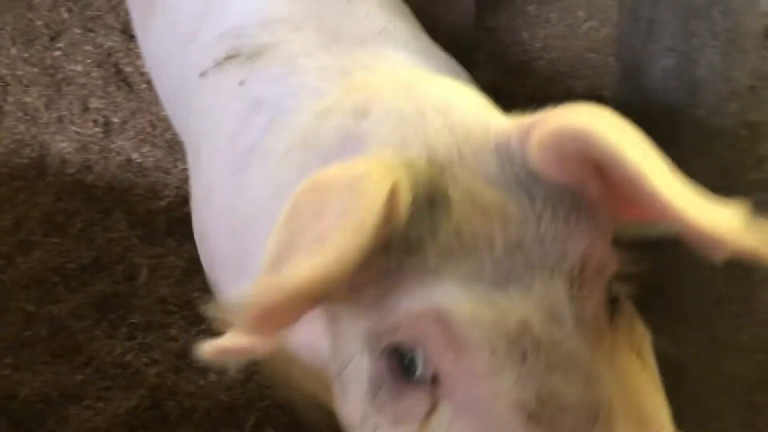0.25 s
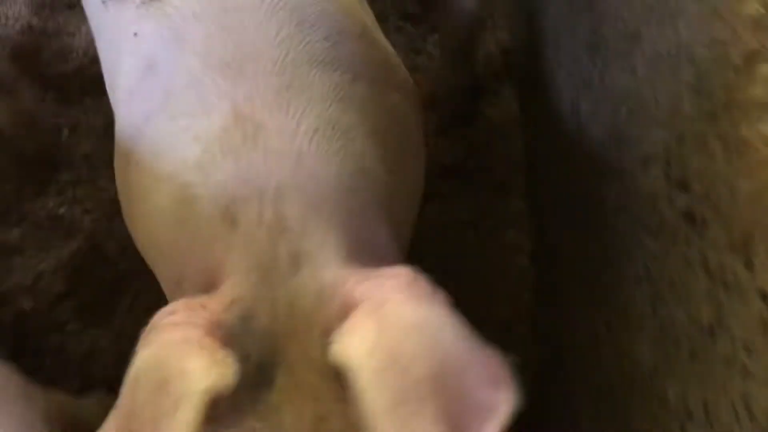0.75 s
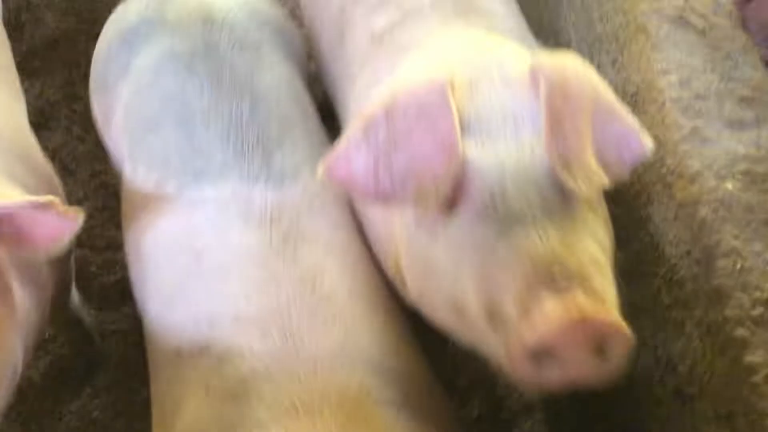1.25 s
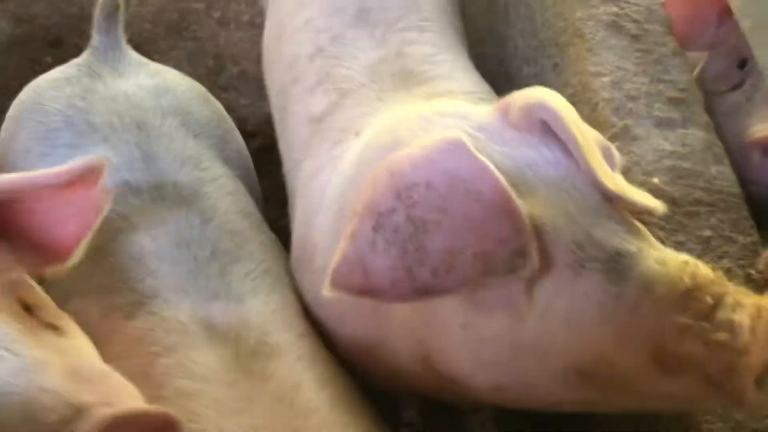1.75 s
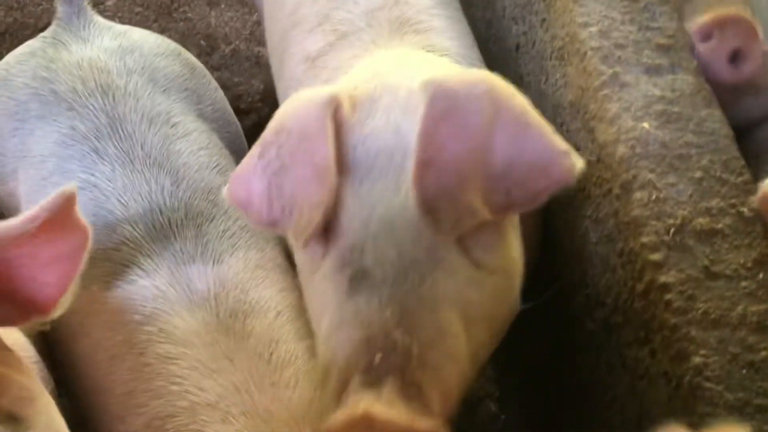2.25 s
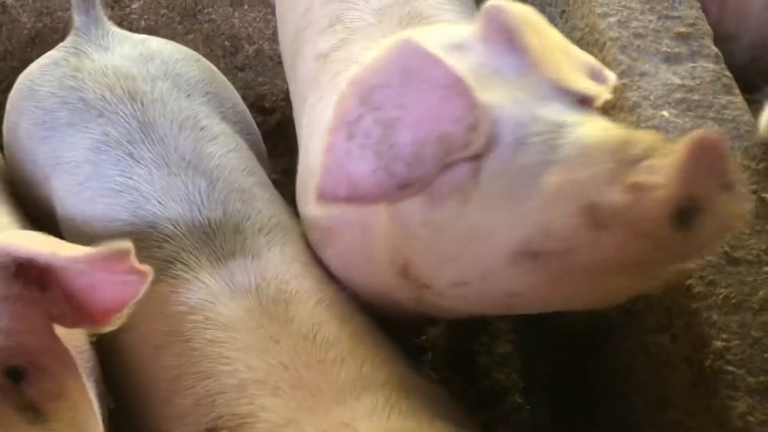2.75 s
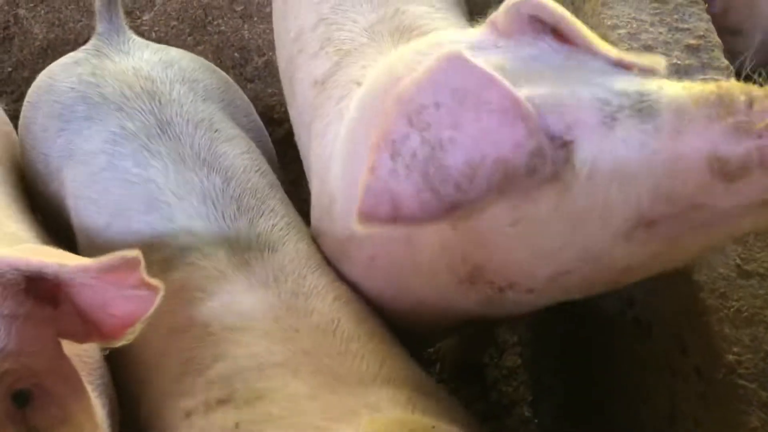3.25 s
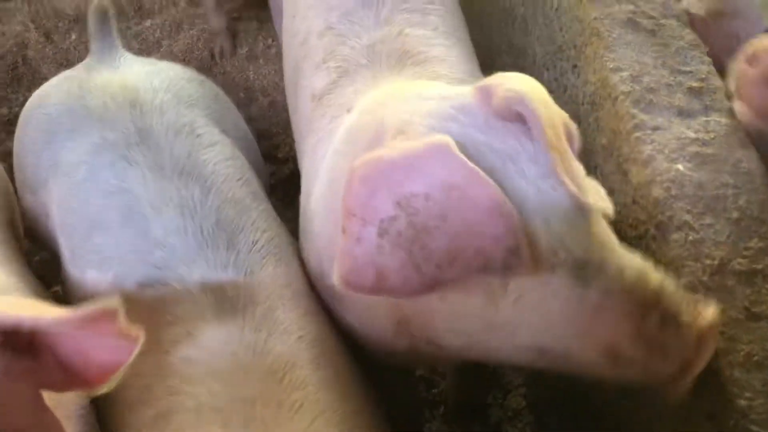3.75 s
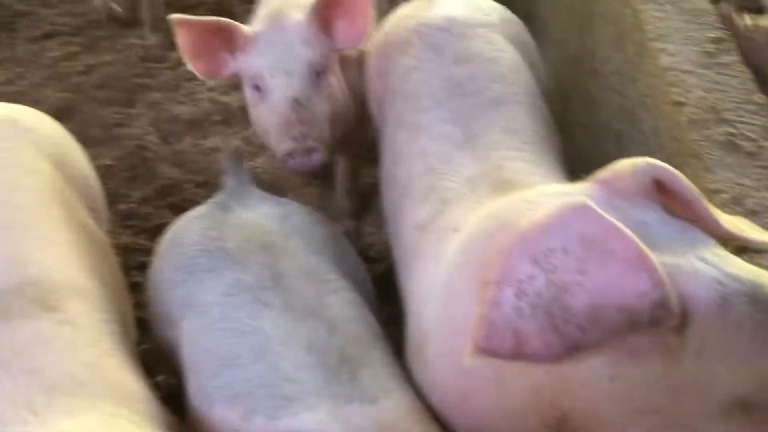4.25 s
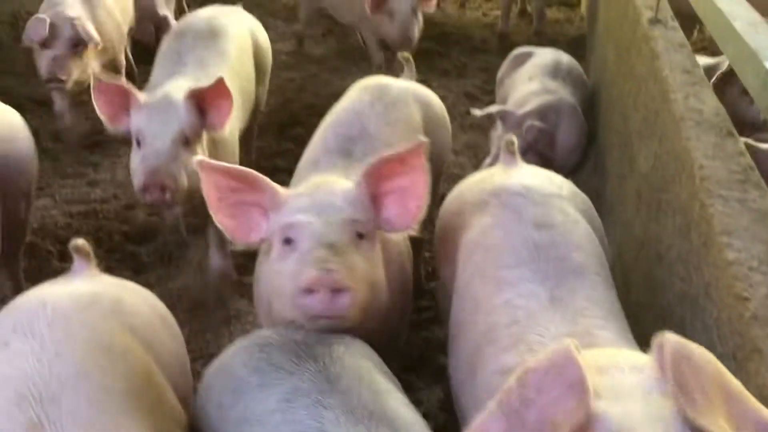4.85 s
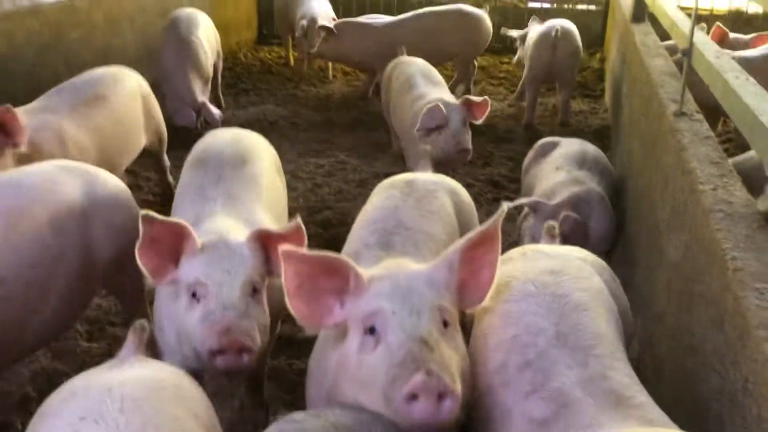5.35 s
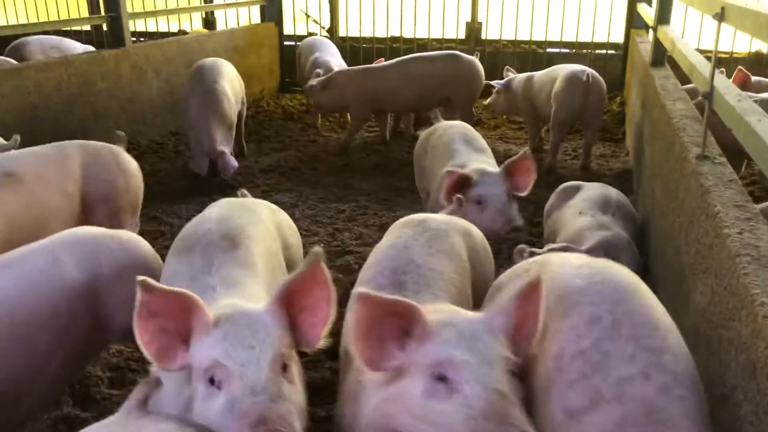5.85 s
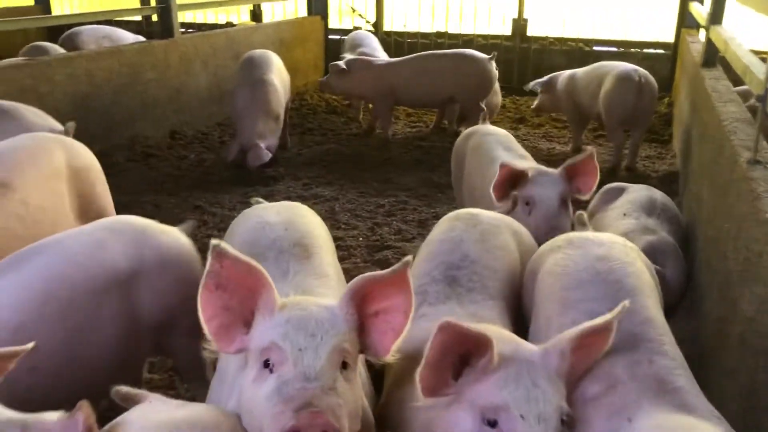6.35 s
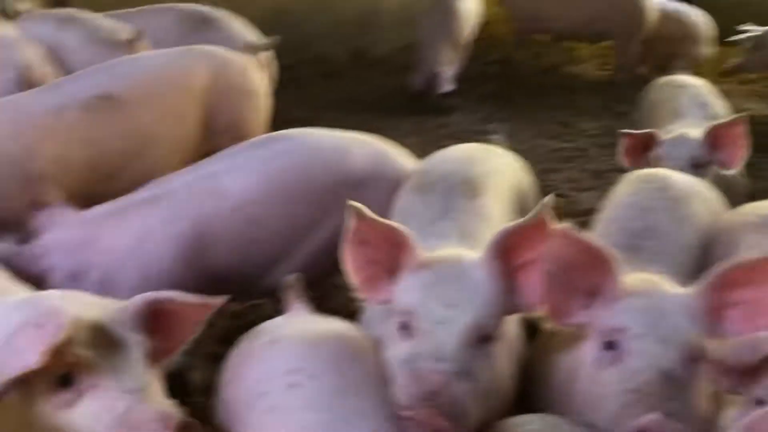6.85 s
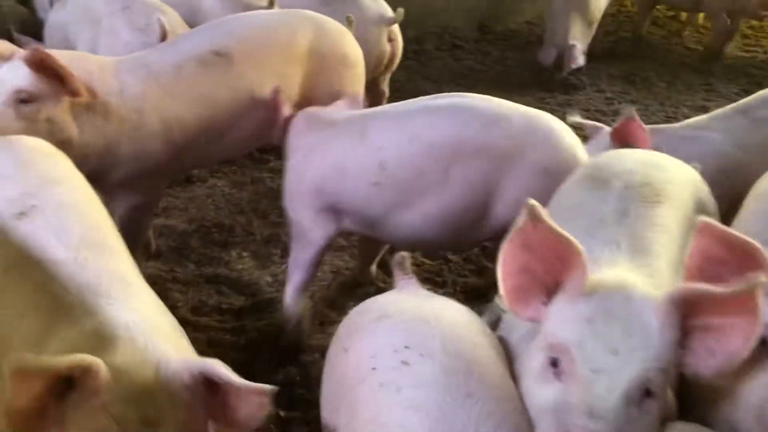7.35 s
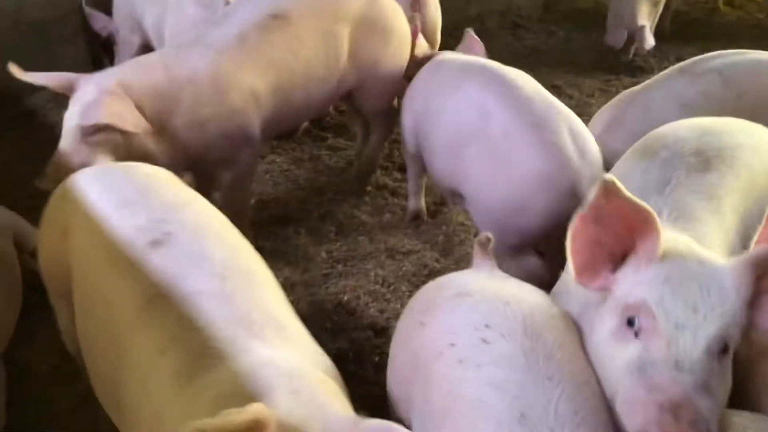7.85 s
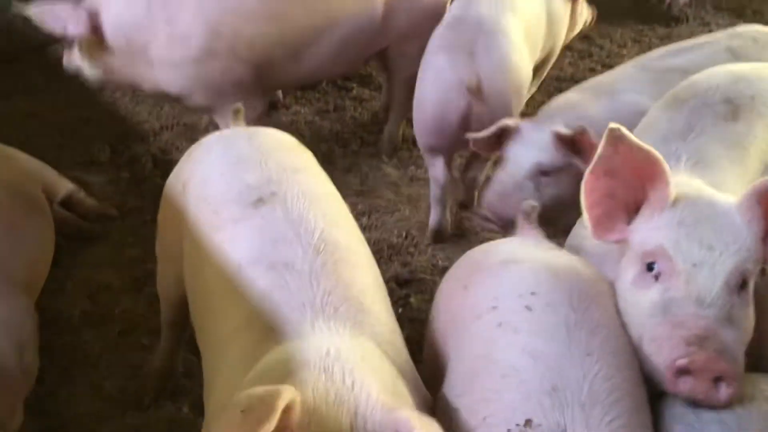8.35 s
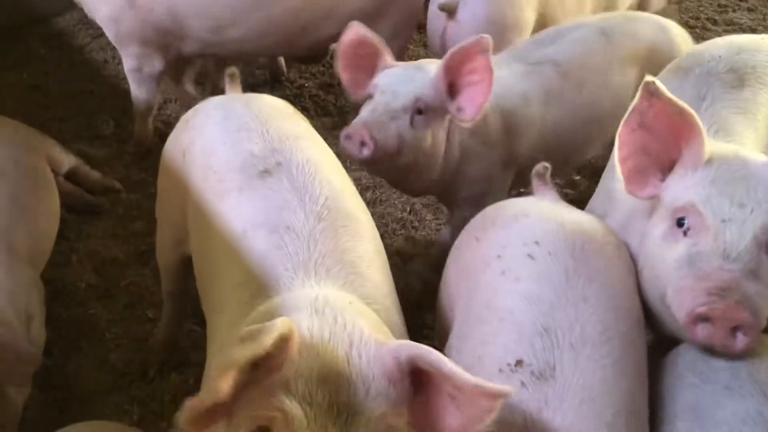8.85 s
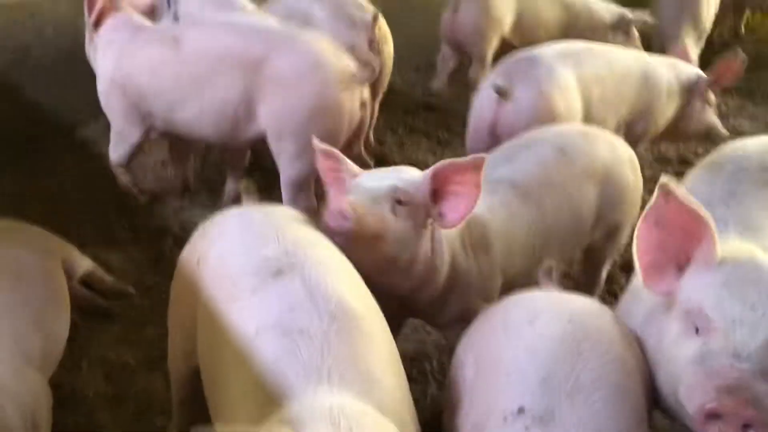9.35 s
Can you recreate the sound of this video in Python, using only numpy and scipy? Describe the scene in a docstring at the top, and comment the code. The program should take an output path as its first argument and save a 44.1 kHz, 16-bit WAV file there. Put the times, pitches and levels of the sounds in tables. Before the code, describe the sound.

Several young pigs grunt close to the microphone in a concrete barn pen, one short, creaky call after another, with hissing sniffs between them. Their bodies bump the fittings with dull booms. Near the middle comes one loud slam and a brief scrape. The grunts carry on more softly, then a sharper call sounds near the end. The rest of the herd murmurs further off over rustling litter.

```python
"""Young pigs grunt in a concrete pen of an open-sided barn. Each grunt is a source driving a filter:
a few slow glottal pulses excite the resonances of nose, mouth and throat, and some close into a hum.
Bodies strike and rub the fittings, and snouts sniff with a turbulent hiss. The rest of the herd
murmurs further off, its grunts heard mostly through the reverberation of roof and walls."""
import sys
import numpy as np
from scipy import signal
from scipy.fft import rfft, irfft, next_fast_len
from scipy.io import wavfile
from scipy.ndimage import map_coordinates

SR = 44100
rng = np.random.default_rng(int(sys.argv[2]) if len(sys.argv) > 2 else 0)


def bounce(signal):
    """Save signal as a 16-bit WAV file at the path given by the first command-line argument."""
    frames = np.transpose(np.atleast_2d(signal))
    limited = np.clip(frames, -1, 1)
    pcm = np.round(limited * 32767).astype(np.int16)
    wavfile.write(sys.argv[1], SR, pcm)


N = 422919
TIME = np.arange(N) / SR
LEAD_S = .012  # room for the brief soft noise with which a pulse fades in

# Grunts: (time [s], pulses [count], pulse rate [Hz], crest position [0-1], swell [dB per grunt length],
# mouth shape [name], mouth level [dB], nose level [dB], rasp level [dB])
GRUNT_CALLS = [(0.015, 4, 39.6, 0.14, 10, "slack", -39, -33.5, -38),
               (0.119, 4, 42.5, 0.86, 10.5, "round", -23.5, -28.5, -32),
               (0.405, 4, 42.2, 0.2, 8, "round", -23.5, -29.5, -39),
               (0.365, 6, 40.1, 0.4, -5, "shut", -36, -33.5, -38),
               (0.527, 3, 36.1, 0.4, 9, "shut", -32.5, -26, -31.5),
               (0.701, 3, 47.6, 0.57, 12, "oink", -21, -51, -29),
               (0.752, 4, 43.04, 0.2, 3, "shut", -46, -40, -36.5),
               (0.827, 2, 34.6, 0.95, 6, "gape", -30, -27.5, -27.5),
               (1.079, 4, 40.67, 0.64, 25.5, "open", -16.5, -25, -24),
               (1.255, 5, 37.7, 0.3, 17, "shut", -36, -27, -39),
               (1.386, 3, 38.4, 0.82, 41, "open", -27.5, -27.5, -30.5),
               (1.478, 5, 45.65, 0.44, 23, "twang", -30.5, -29.5, -27.5),
               (1.675, 2, 33.1, 0.5, 2, "round", -43, -34.5, -44.5),
               (1.948, 4, 32.67, 0.3, 20, "open", -26.5, -27.5, -36.5),
               (2.112, 5, 35.2, 0.41, 12, "shut", -31, -31, -35.5),
               (2.318, 5, 40.78, 0.67, 33, "twang", -27, -25, -30),
               (2.754, 3, 36.25, 0.6, 14, "oink", -27, -29, -29),
               (2.828, 4, 40.2, 0, 6, "shut", -34, -30, -35.5),
               (3.021, 3, 37.9, 1, 2, "shut", -35, -32, -36.5),
               (3.094, 4, 44.3, 0.38, 6, "twang", -27.5, -25, -30),
               (3.473, 4, 36.84, 0.83, 9, "wide", -38, -51, -40),
               (3.645, 4, 31.44, 0.77, 22, "slack", -37, -32, -32.5),
               (3.914, 4, 36.5, 0.2, 9, "wide", -34, -31, -34.5),
               (4.557, 5, 34.04, 0.5, 10, "shut", -39, -33.5, -39.5),
               (4.89, 7, 48.06, 0.8, 5, "shut", -48, -42, -47),
               (5.075, 4, 46.9, 0.9, 2, "slack", -44, -39, -58),
               (5.135, 5, 35.04, 0.57, 37, "nasal", -38.5, -34.5, -36),
               (5.78, 6, 59.4, 0.5, 3, "slack", -42, -40, -44.5),
               (5.98, 5, 40.77, 0.8, 14, "slack", -46, -28, -42),
               (6.323, 4, 34.17, 0.57, 46, "wide", -35, -33, -30),
               (6.67, 8, 67.6, 0.77, 14, "wide", -44, -35.5, -60),
               (6.99, 4, 51.6, 1, 0, "shut", -41.5, -41, -43),
               (7.097, 3, 33.16, 1, 14.5, "wide", -34.5, -33, -31.5),
               (7.246, 7, 57.83, 0.67, 2, "round", -41.5, -30, -53),
               (7.472, 3, 37.93, 0.9, 11.5, "nasal", -33, -33.5, -49.5),
               (7.647, 6, 40.65, 0.7, 7, "nasal", -38, -36, -41),
               (7.787, 6, 39.97, 0.36, 5, "shut", -41, -28, -37.5),
               (8.092, 2, 35.6, 1, 6, "slack", -39, -30, -44),
               (8.185, 5, 35.6, 0.37, 29, "slack", -45.5, -34, -44.5),
               (8.402, 6, 41.3, 0.42, 19, "slack", -44, -36, -62),
               (8.656, 6, 35.9, 0.39, 10, "wide", -31.5, -30.5, -32.5),
               (8.81, 4, 33.5, 0, 16, "shut", -46.5, -35, -58),
               (8.966, 4, 65.7, 0.6, 19, "cry", -20.5, -41, -26.5),
               (9.261, 5, 40.1, 0.39, 19, "snarl", -31, -29.5, -34.5)]
# Background levels, with a brief dip at 3.35 s: (time [s], murmur level [dB], rustle level [dB])
HERD_LEVELS = [(0, -31, -47), (1.07, -36, -48), (2, -28.5, -44.5), (2.6, -37.5, -45), (3.2, -32, -46),
               (3.35, -36.5, -52), (3.6, -35.5, -49), (4.2, -36.5, -45), (4.7, -38, -45), (6.9, -40.5, -48),
               (7.3, -35, -47), (7.852, -36.5, -47.5), (9.59, -38.5, -47.5)]
# Spectrum of rubbing bristles, litter and grit: (frequency [Hz], level [dB])
FRICTION_SPECTRUM = [(1000, 2.5), (2500, 1), (4500, 1.5), (6000, 1), (8500, -3), (10500, -8.5),
                     (16000, -16)]


def near_pigs():
    """Superposition: the grunts at the front of the pen add as sound pressures."""
    out = np.zeros(N)
    for start, *voice in GRUNT_CALLS:
        add(out, grunt(*voice), start - .001 - LEAD_S)
    return out


def grunt(count, rate, crest, swell_db, shape, mouth_db, nose_db, rasp_db):
    """Source-filter voicing: creaky glottal pulses excite the resonances of chest, nose and mouth."""
    # Vocal tract by shape: (three formants as (frequency [Hz], level re mouth [dB]),
    # throat as (frequency [Hz], level re rasp [dB]), second-formant glide [fraction],
    # wet crack level re rasp [dB], flap level re pulse [dB])
    tracts = {"shut": ((495, -0.9), (1200, -11.5), (1600, -4), (2750, -1.9), 0.14, -8, -7),
              "twang": ((495, -0.79), (1240, -9.5), (1460, -4.5), (2500, -1.7), 0.11, -9.5, -12.5),
              "slack": ((492, -2), (690, -3), (1622, 0), (2600, 0), 0, -4.5, -9.5), "round": ((475, -9),
              (792, 1.5), (1375, -6.5), (2750, 1), 0.063, -6.5, -13.5), "wide": ((490, -3), (1226, -3.9),
              (1526, .3), (2520, 0.91), 0.046, -5.5, -26), "nasal": ((535, -4), (1225, -1.3), (1510, 0.66),
              (2600, 1), 0, -9, -13), "snarl": ((650, -4), (1250, -1.8), (1490, 0), (3080, -1.4),
              0.049, -12, -20), "open": ((426, 0), (987, -6.5), (1790, -6.5), (2210, 0), 0.44, -11, -12),
              "gape": ((424, -3), (890, 0), (1256, 2.2), (3500, -16), 0.091, -13, -16), "oink": ((397, 0),
              (887, 0), (1294, -4), (2500, -1.7), 0.18, -10, -14.5), "cry": ((395, 0), (930, 4), (1500, -7),
              (2700, -28), -.04, -27, -17)}
    # Rasp by shape: (glide [fraction], modes as (frequency [Hz], bandwidth [Hz], level re rasp [dB]))
    rasps = {"shut": (0.19, [(3450, 190, -13), (4110, 240, -7.5), (4760, 140, -10), (5880, 400, -13)]),
             "twang": (.08, [(3750, 170, -10), (4280, 220, -3.5), (4660, 150, -10), (5700, 400, -19)]),
             "slack": (0.29, [(3680, 250, -18), (4270, 150, -5.5), (5400, 330, -6), (8400, 600, -19)]),
             "round": (0.154, [(3750, 170, -15), (4410, 110, -6.5), (5240, 210, -7), (6200, 500, -18)]),
             "wide": (0.17, [(3640, 170, -17), (4290, 120, -4), (5450, 210, -8), (8300, 550, -22.5)]),
             "nasal": (0, [(2320, 260, -8.5), (3770, 620, -9), (4800, 150, -8), (6240, 206, -15)]),
             "snarl": (0.16, [(3830, 150, -7.5), (4880, 140, -10), (6100, 180, -5), (8500, 500, -24)]),
             "open": (.03, [(3890, 160, -5.5), (4280, 150, -8.5), (5070, 130, -9.5), (5850, 400, -16)]),
             "gape": (0, [(3990, 110, -1.5), (4440, 90, -12), (5100, 90, -14), (6700, 140, -20.5)]),
             "oink": (0.032, [(3905, 64, -7.5), (4470, 150, -8.5), (5150, 180, -9.5), (5750, 89, -18)]),
             "cry": (-.06, [(3560, 59, -6.5), (4000, 50, -9), (5000, 110, -15), (5800, 80, -17)])}
    # Upper throat modes: (frequency re throat [ratio], bandwidth [Hz], relative level [dB])
    throat_modes = [(.84, 94, 1.5), (1.001, 150, 1), (1.13, 94, 1.5)]
    # Antiresonances of the snout's side cavities: (frequency [Hz], bandwidth [Hz])
    antiresonances = [(3230, 133), (5450, 350)]
    *formants, (throat_hz, throat_db), opening, crack_db, flap_db = tracts[shape]
    climb, rasp_modes = rasps[shape]
    size_shift = np.exp(.019 * rng.standard_normal())  # body size shifts the formants together
    (f1_hz, f1_db), (f2_hz, f2_db), (f3_hz, f3_db) = [
        (hz * size_shift, mouth_db + db) for hz, db in formants]
    length = count / rate
    times = np.maximum(np.arange(count) + .015 * rng.standard_normal(count), 0) / rate
    place = np.linspace(0, 1, count)
    force_db = -max(swell_db, 0) * abs(place - crest)
    # The slack folds flap once more, weakly, within each cycle.
    lag, loss = rng.random((count, 2)).T
    times = np.append(times, times + (.25 + .6 * lag) / rate)
    force_db = np.append(force_db, force_db + flap_db - 10 * loss)
    mouth = undb(force_db)
    rasp = undb(force_db + np.repeat([0, 1], count))  # flaps favour the rasp
    nose = undb(.47 * force_db + 3.9 * np.tile(place, 2))  # the nose takes over as the mouth closes

    nose_hz = 264 * np.exp(.0546 * rng.standard_normal())
    chest_hz = 128 * np.exp(.09 * rng.standard_normal())
    chest_db = (nose_db + rasp_db) / 2 - 6.5
    out = resonance(times, nose, chest_hz, 130, chest_db, length, rough=.95, jitter=.36, burst_s=.0037)
    out += resonance(times, nose, nose_hz * 1.077, 85, nose_db, length,
                     rough=.48, jitter=.13, burst_s=.00581)
    add(out, nasal_hum(length, nose_hz * 1.03, crest, swell_db, nose_db - 3.5), LEAD_S)
    out += resonance(times, undb(.62 * force_db), f1_hz, 78, f1_db - .5, length,
                     rough=.79, burst_s=.004105)
    out += resonance(times, mouth, f2_hz, 90, f2_db - 3.5, length,
                     rough=.26, jitter=.024, burst_s=.00271, rise_s=.002, glide=opening)
    out += resonance(times, mouth, np.sqrt(f2_hz * f3_hz), 240, min(f2_db, f3_db) - 5.5, length,
                     rough=.58, jitter=.051, rise_s=.0011, glide=opening)
    out += resonance(times, mouth, f3_hz, 123, f3_db - .6, length,
                     rough=.59, jitter=.012, burst_s=.0029, rise_s=.0013)
    for ratio, width, db in throat_modes:
        hz = throat_hz * ratio * np.exp(.0345 * rng.standard_normal())
        out += resonance(times, mouth, hz, width, rasp_db + throat_db + db - 11.5, length,
                         rough=1.6, shimmer_db=5, jitter=.012, burst_s=.0014)
    out += resonance(times, mouth, 2920, 2860, rasp_db + crack_db, length,
                     rough=18, shimmer_db=2, burst_s=.0019)  # broad wet crack
    out += resonance(times, mouth, 11000, 1500, rasp_db - 28, length,
                     rough=3, shimmer_db=3, jitter=.15, burst_s=.004)  # saliva crackles
    for hz, width, db in rasp_modes:
        out += resonance(times, rasp, hz * size_shift, width, rasp_db + db, length,
                         rough=1.04, shimmer_db=3.5, jitter=.009 + .08 * abs(climb),
                         glide=climb, chirp_per_s=97 * climb, rise_s=.00086, burst_s=.0017)
    for hz, width in antiresonances:
        out = signal.lfilter(*signal.iirnotch(hz * size_shift, hz / width, fs=SR), out)
    return out


def resonance(times, strengths, hz, width_hz, db, length, rough, shimmer_db=1.7, jitter=.015,
              burst_s=.0038, rise_s=.0018, glide=0, chirp_per_s=0):
    """A damped mode rings with each pulse and its burst of noise; bandwidth sets the rate of decay."""
    t = np.arange(int(SR * min(2.2 / width_hz, .05))) / SR
    lead = int(2 * burst_s * SR)
    age = np.arange(-lead, lead + 2) / SR / burst_s
    out = np.zeros(int((length + .13) * SR))
    for start, strength in zip(times, strengths):
        shift, gain, bend, slack = rng.standard_normal(4)
        looseness = np.exp(.26 * slack)  # from tight snaps to loose pulses
        place = min(start / length, 1)
        arch = .047 * (np.sin(np.pi * place ** .8) - .8)  # lifts in mid-grunt, sinks at the end
        centre_hz = hz * (1 + jitter * shift + glide * (place - .5) + arch)
        sweep_hz = np.minimum(centre_hz * (1 + chirp_per_s * (.5 + bend) * t), SR * .45)
        attack = 1 - np.exp(-t / (rise_s * looseness))
        mode = np.exp(-np.pi * width_hz * t) * attack * sine(sweep_hz)
        # Each pulse fades in with a brief soft noise that peaks just behind the snap.
        burst = rng.standard_normal(len(age)) * np.exp(-abs(age - .6) / (.46 * looseness))
        burst *= rough / np.linalg.norm(burst)
        burst[lead] += 1  # the snap
        pulse = np.convolve(mode, burst)
        pulse *= strength * undb(shimmer_db * gain) / np.linalg.norm(pulse)
        add(out, pulse, start + LEAD_S - lead / SR)
    return at_level(out, db, length)


def nasal_hum(length, hz, crest, swell_db, db):
    """Nasal resonance: the closed snout sustains a wavering tone between the pulses."""
    t = np.arange(int((length + .13) * SR)) / SR
    place = t / (length + .0172)
    envelope = np.sin(np.pi * np.minimum(place, 1) ** 1.17) ** .5
    envelope *= undb(-.25 * swell_db * abs(place - crest))
    waver = np.interp(t, np.linspace(0, t[-1], 16), rng.standard_normal(16))
    return at_level(envelope * sine(hz * (1 + .067 * waver)), db, length)


def bumps():
    """Impact excitation: flanks and trotters set gate and feeder booming; one blow is a hard slam."""
    # Impacts: (time [s], level [dB], rise [s], T60 at 1200 Hz [s], low-pass cutoff [Hz])
    impacts = [(1.733, -26, 0.004, 0.24, 196), (1.754, -18, 0.0032, 0.49, 770),
               (1.99, -17.5, 0.049, 0.57, 370), (2.421, -26, 0.011, 0.094, 154),
               (2.846, -22, 0.0032, 0.25, 224), (3.11, -24, 0.007, 0.59, 190),
               (3.274, -27.5, 0.0016, 0.42, 1400), (4.186, -24, 0.013, 0.35, 230),
               (4.2254, -15, 0.0039, 0.49, 1720), (4.228, -24, 0.0091, 0.7, 200),
               (5.215, -27, 0.0087, 0.52, 196), (8.239, -26, 0.01, 0.32, 166)]
    # Spectrum of the fittings ahead of the low-pass: (frequency [Hz], level [dB])
    boom_spectrum = [(30, -29), (80, -4.5), (200, -3), (400, -1.5), (800, -5), (1500, -7.5), (3000, -4),
                     (6500, 7.5), (16000, -4)]
    # The slam: (time [s], level [dB], duration [s])
    slam = (4.2262, -5, 0.013)
    # Spectrum of the slam: (frequency [Hz], level [dB])
    slam_spectrum = [(30, -8), (90, -20), (200, 13), (400, -10), (560, 6.5), (1050, -12), (1600, -0.5),
                     (2400, -15), (3500, -12.5), (5000, -27), (8000, -24), (16000, -43)]
    out, t = np.zeros(N), np.arange(SR) / SR
    for start, db, rise, t60, cutoff_hz in impacts:
        t60s = [(150, t60 * 1.68), (1200, t60), (3000, t60 * .63), (9000, t60 * .56)]
        bright = decaying_noise(boom_spectrum, t60s, SR)
        dull = signal.sosfilt(signal.butter(2, cutoff_hz, fs=SR, output="sos"), bright)
        boom = dull + .046 * cutoff_hz / 2600 * bright
        add(out, boom / np.std(boom[:SR // 20]) * np.minimum(t / rise, 1) * undb(db), start)
    start, db, length = slam
    add(out, noise(slam_spectrum, SR) * np.exp(-(t / length) ** 4) * undb(db), start)
    return out


def scrape(start_s=4.414, groan_db=-4, groan_s=.08, groan_width_hz=260):
    """Sliding friction: a flank rubs along the gate, whose groan sinks as the flank slows."""
    # Envelope of the rub: (level [dB], rise [s], hold [s], T60 [s])
    stroke = (-24.5, .012, 0.06, 0.35)
    # Spectrum of the rub: (frequency [Hz], level [dB])
    rub_spectrum = [(80, -10), (300, 3.5), (600, 0.5), (950, -2), (1400, -4), (2200, -11), (4000, -15.5),
                    (8000, -25), (16000, -42)]
    # Glide of the groan: (first pitch [Hz], last pitch [Hz])
    groan_hz = (1350, 696)
    db, rise, hold, t60 = stroke
    out, t = np.zeros(N), np.arange(SR) / SR
    groan = unit(wander(groan_width_hz)[:SR] * sine(np.interp(t, [0, groan_s], groan_hz)))
    rub = noise(rub_spectrum, SR) + undb(groan_db) * groan
    envelope = np.minimum(t / rise, 1) * undb(db - 60 * np.maximum(t - hold, 0) / t60)
    add(out, rub * envelope, start_s)
    return out


def short_hisses(flutter_db=3, peak_hz=6000, whistle_db=1):
    """Noise with a resonant peak: sniffs, and at 4.4 s the hiss of the scrape."""
    # Short hisses: (time [s], duration [s], level [dB])
    hisses = [(0.329, 0.27, -44.5), (0.87, 0.39, -44.5), (1.406, 0.26, -39.5), (1.918, 0.24, -43.5),
              (2.339, 0.24, -47), (2.964, 0.23, -47), (3.406, 0.23, -44), (3.612, 0.16, -36.5),
              (3.903, 0.2, -44), (4.398, 0.1, -41), (4.84, 0.2, -56), (5.284, 0.21, -49), (5.681, .16, -62),
              (6.056, 0.16, -44), (7.172, 0.19, -50.5), (7.778, 0.34, -43.5), (8.709, 0.28, -44),
              (9.286, 0.16, -48)]
    # Spectrum of the hiss: (frequency [Hz], level [dB])
    hiss_spectrum = [(1000, -5), (3000, 1.5), (5800, -5.5), (8500, 1), (10500, -5.5), (16000, -9.5)]
    out = np.zeros(N)
    for start, length, db in hisses:
        place = np.linspace(0, 1, int(length * SR))
        hz = min(peak_hz * np.exp(.096 * rng.standard_normal()), SR * .4)
        whistle = unit(signal.lfilter(*signal.iirpeak(hz, 5, fs=SR), rng.standard_normal(len(place))))
        hiss = unit(noise(hiss_spectrum, len(place)) + undb(whistle_db) * whistle)
        add(out, hiss * abs(np.sin(np.pi * place)) ** .39 * undb(db), start)
    return flicker(out, depth_db=3, patch_hz=598, patch_s=.06) * undb(flutter_db * wander(45))


def far_pigs(count=56, voices=6, cutoff_hz=1800):
    """Attenuation with distance: weak, dull grunts overlap and follow the level of the murmur."""
    out = np.zeros(N)
    calls = [unit(grunt(*GRUNT_CALLS[k][1:])) for k in rng.integers(len(GRUNT_CALLS), size=voices)]
    times, murmur_db, _ = np.transpose(HERD_LEVELS)
    for k, (lag, which, distance) in enumerate(rng.random((count, 3))):
        add(out, calls[int(which * voices)] * undb(-5 * distance), (k + lag) / count * N / SR)
    dull = signal.sosfilt(signal.butter(1, cutoff_hz, fs=SR, output="sos"), out)
    return dull * undb(np.interp(TIME, times, murmur_db) - 12)


def herd(grit_db=-59, scuffs=200):
    """Incoherent sources merge into noise: murmuring animals, rustling litter and scuffed grit."""
    # Spectrum of the massed voices: (frequency [Hz], level [dB])
    murmur_spectrum = [(15, -54), (25, -70), (65, 4), (108, 5), (215, -1.5), (350, -2), (408, -10.5),
                       (620, -3.5), (849, -12.5), (1290, -12), (1650, -16), (1930, -19.5), (5000, -22),
                       (6500, -30), (11000, -120)]
    times, murmur_db, rustle_db = np.transpose(HERD_LEVELS)
    murmur = sum(noise(murmur_spectrum, N) * undb(2.8 * wander(14)) for _ in range(2)) / 2
    murmur *= undb(np.interp(TIME, times, murmur_db) - 1)
    rustle = flicker(noise(FRICTION_SPECTRUM, N), depth_db=3.5, patch_hz=650, patch_s=.05)
    rustle *= undb(.75 * wander(9) + np.interp(TIME, times, rustle_db))
    grit, window = np.zeros(N), np.hanning(SR // 120) ** 2
    for when, force in rng.random((scuffs, 2)):
        scuff = noise(FRICTION_SPECTRUM, len(window)) * window
        add(grit, scuff * undb(20 * force ** 2), when * N / SR)
    return murmur + rustle + unit(grit) * undb(grit_db)


def pen(x, t60_s=.23):
    """Early reflections: floor, wall and bodies scatter each pulse back."""
    t = np.arange(SR // 8) / SR
    response = noise([(100, 0), (1200, 7), (4000, -.5), (12000, -2.5)], len(t))
    response *= undb(-60 * t / t60_s) * (t > .003)
    return signal.fftconvolve(x, response / np.linalg.norm(response))[:N]


def barn(x, build_s=.025):
    """Diffuse reverberation from roof and walls, with unit rms gain over 100-1000 Hz."""
    # Spectrum of the reverberant field: (frequency [Hz], level [dB])
    field_spectrum = [(40, -8), (120, 3.5), (300, -2.5), (1000, -13.5), (3000, -6), (8000, -24),
                      (16000, -16)]
    # Reverberation times: (frequency [Hz], T60 [s])
    t60s = [(100, 0.39), (1000, 0.89), (4000, 0.18), (12000, 0.22)]
    response = decaying_noise(field_spectrum, t60s, SR) * np.minimum(np.arange(SR) / SR / build_s, 1)
    gain = abs(rfft(response))
    return signal.fftconvolve(x, response / np.sqrt(np.mean(gain[100:1000] ** 2)))[:N]


def noise(spectrum, size):
    """Spectral shaping: noise of rms 1 that follows (frequency [Hz], level [dB]) points."""
    n = next_fast_len(size)
    gain = undb(at_hz(spectrum, np.fft.rfftfreq(n, 1 / SR)))
    return unit(irfft(rfft(rng.standard_normal(n)) * gain, n)[:size])


def decaying_noise(spectrum, t60s, size):
    """Frequency-dependent damping: each octave of a noise dies away at its own rate."""
    t, octave = np.arange(size) / SR, np.log2(np.fft.rfftfreq(size, 1 / SR) + 1)
    bins = rfft(noise(spectrum, size))
    out = np.zeros(size)
    for k in range(5, 15):
        band = irfft(bins * np.maximum(1 - abs(octave - k), 0), size)
        out += band * undb(-60 * t / at_hz(t60s, 2. ** k))
    return out


def flicker(x, depth_db, patch_hz, patch_s):
    """Random amplitude modulation: narrow bands of a hiss flare and fade independently."""
    hz, times, bins = signal.stft(x, SR, nperseg=512)
    grid = np.meshgrid(hz / patch_hz, times / patch_s, indexing="ij")
    flare = map_coordinates(rng.standard_normal((64, 512)), grid, order=1, mode="mirror")
    return signal.istft(bins * unit(undb(depth_db * flare)), SR)[1][:N]


def wander(rate_hz):
    """Interpolated random drift with a spread near 1."""
    knots = rng.standard_normal(int(N / SR * rate_hz) + 2)
    return np.interp(TIME * rate_hz, np.arange(len(knots)), knots)


def sine(hz):
    """A tone whose phase is the integral of its frequency."""
    return np.sin(2 * np.pi * np.cumsum(hz) / SR)


def at_hz(points, hz):
    """Interpolate (frequency [Hz], value) points on a log-frequency axis."""
    frequencies, values = np.transpose(points)
    return np.interp(np.log(hz + 1), np.log(frequencies), values)


def at_level(x, db, length):
    """Scale to the energy of an rms level db held for length seconds."""
    return x * undb(db) * np.sqrt(length * SR / np.sum(x ** 2))


def undb(db):
    """Decibels to amplitude ratio."""
    return 10 ** (np.asarray(db) / 20)


def unit(x):
    """Scale to rms 1."""
    return x / np.sqrt(np.mean(x ** 2))


def add(out, x, start_s):
    """Superpose x on out from start_s."""
    i = max(int(start_s * SR), 0)
    out[i:i + len(x)] += x[:max(len(out) - i, 0)]


def scene():
    """The direct-to-reverberant ratio falls with distance: near pigs are almost dry, far ones diffuse."""
    near, far, knocks = near_pigs(), far_pigs(), bumps() + scrape()
    early = near + undb(-15.5) * pen(near) + undb(-23) * far + knocks + short_hisses() + herd()
    reverberation = barn(undb(-15) * near + undb(6) * far + undb(-15.5) * knocks)
    return (early + reverberation)[None]


def record(dry):
    """Band limiting and saturation: the microphone thins the bass, rounds peaks and cuts the top."""
    thinned = signal.sosfilt(signal.butter(3, 46, "high", fs=SR, output="sos"), dry)
    return signal.sosfilt(signal.ellip(10, .2, 70, 15950, fs=SR, output="sos"), np.tanh(thinned))


dry = scene()
out = record(dry)
bounce(out)
```